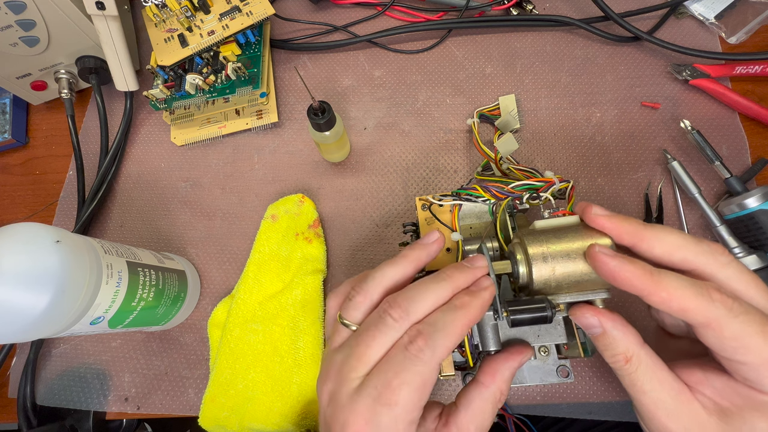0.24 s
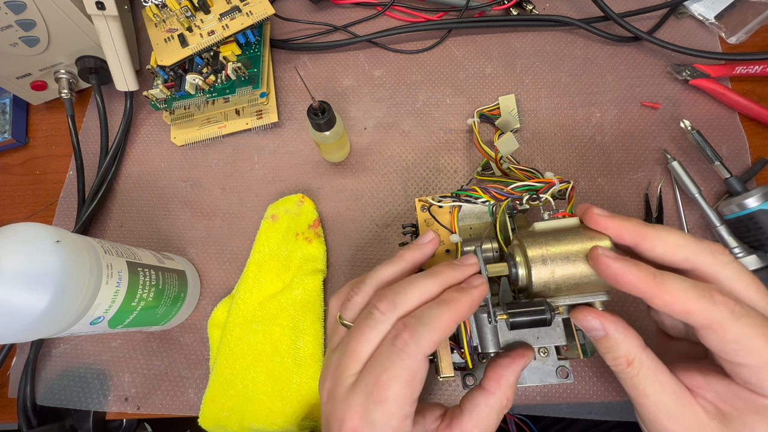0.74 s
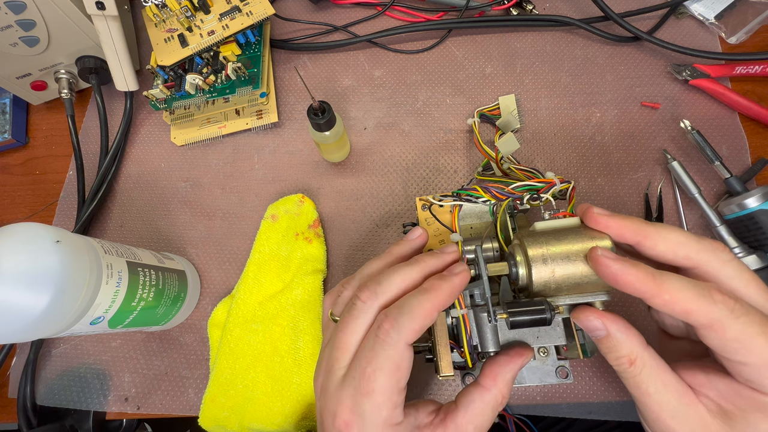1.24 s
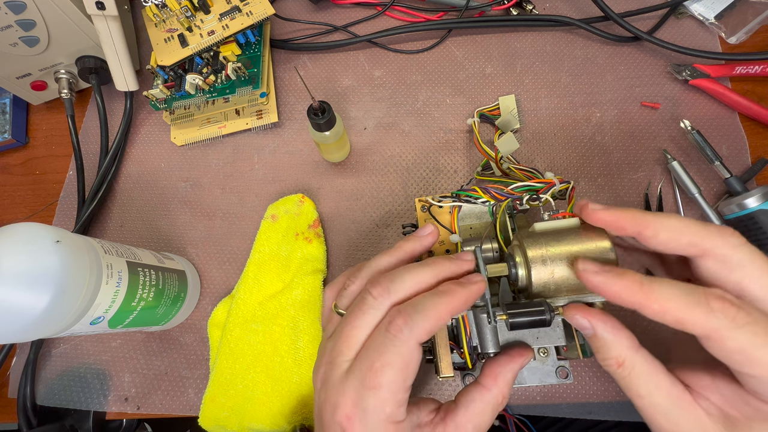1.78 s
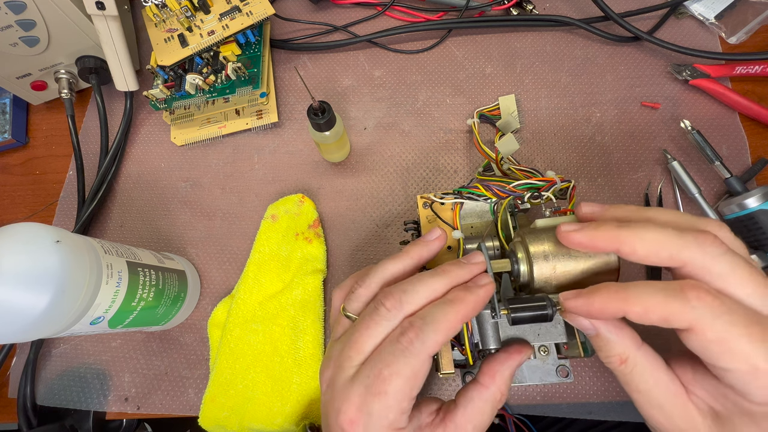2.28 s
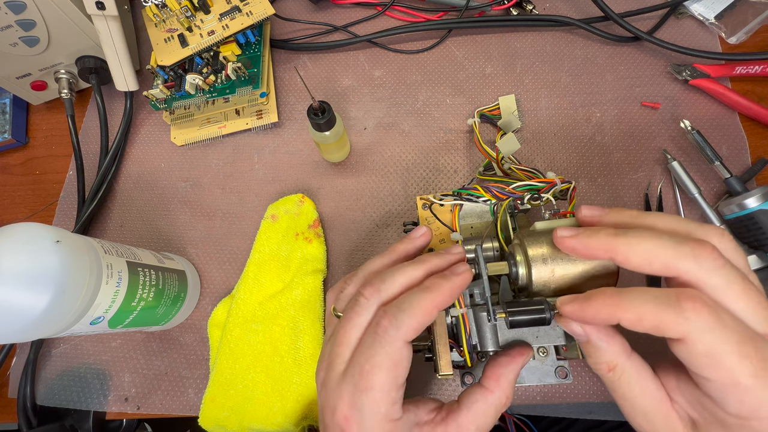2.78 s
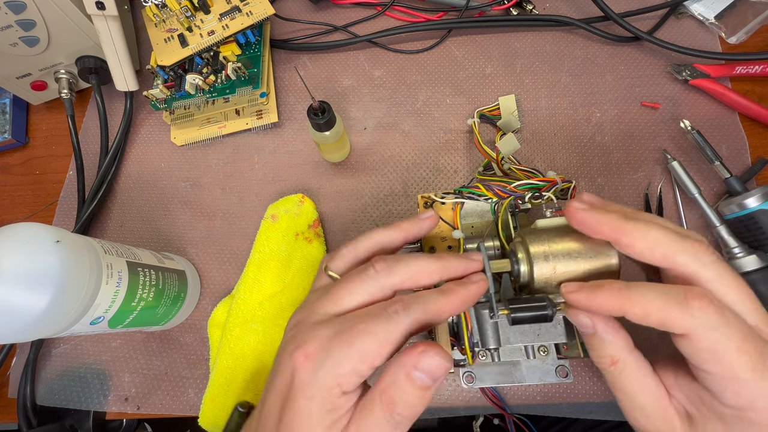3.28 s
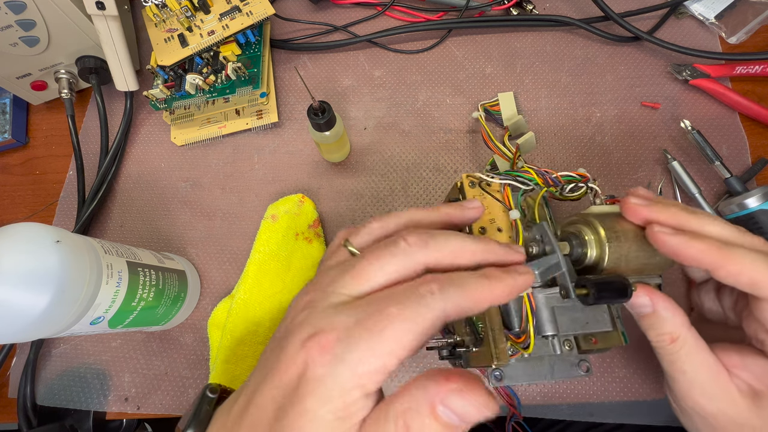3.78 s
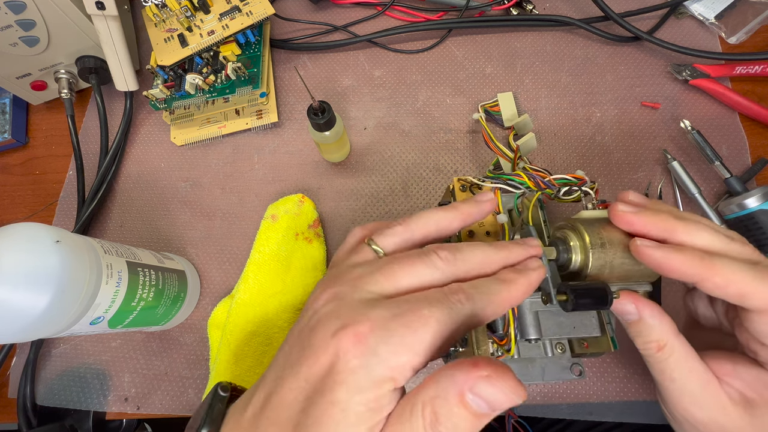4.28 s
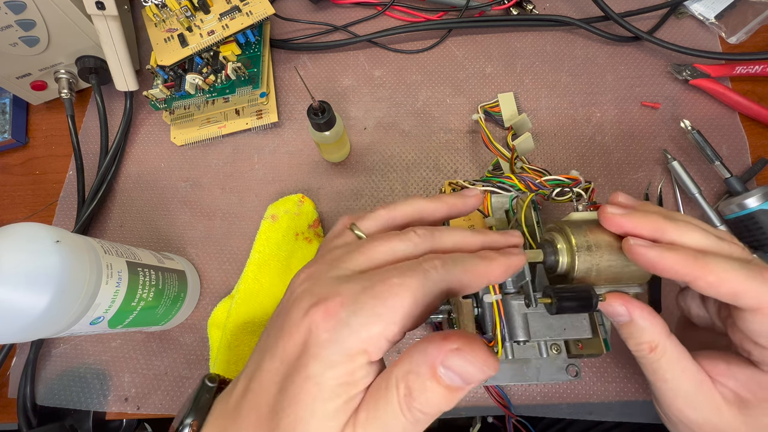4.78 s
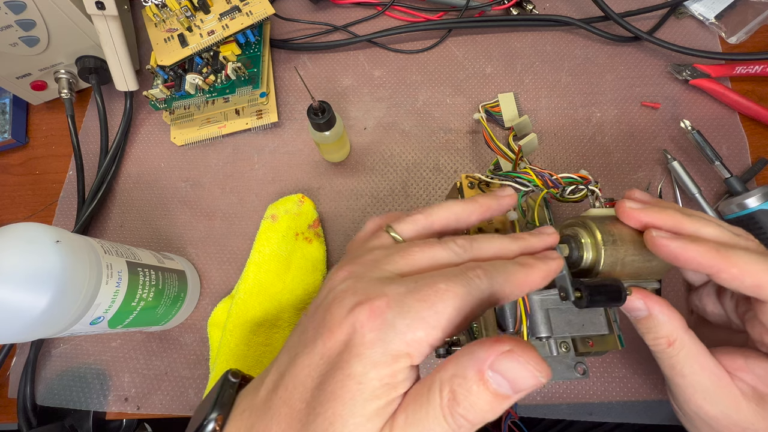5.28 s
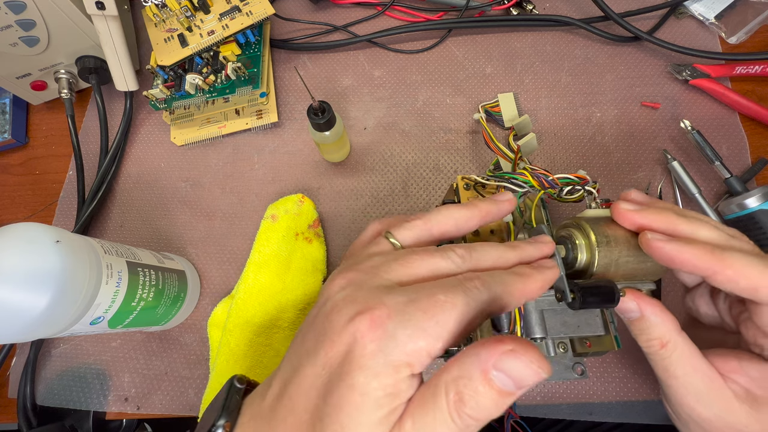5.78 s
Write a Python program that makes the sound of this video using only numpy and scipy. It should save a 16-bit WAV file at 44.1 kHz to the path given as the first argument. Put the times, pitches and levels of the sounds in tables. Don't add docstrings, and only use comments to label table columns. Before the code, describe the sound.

A solenoid is pushed and released by hand on a padded bench, heard close in stereo in a small room. A faint tick and scrape lead to a sharp metal clack at 0.2 s, with a small bouncing release tick at 0.4. The pattern repeats with clacks at 0.85 and 1.55, releases near 1.0 and 1.7. A softer, duller clack comes at 2.35, then a dull knock and thump at 2.5. After a pause, a soft clack at 3.4 is followed by a heavy low bench thud at 3.7. A firmer clack lands at 4.35, with another thud at 4.6 and a cluster of dull knocks around 4.95. A release and thump fall near 5.3; catches lead to the hardest, brightest clack at 5.8, then closing ticks around 6.0. Low fan hum, faint transformer buzz, soft air and hiss continue throughout.

```python
import sys
import numpy as np
from scipy import signal
from scipy.fft import rfft, irfft, next_fast_len
from scipy.io import wavfile
from scipy.ndimage import map_coordinates

SR = 44100
rng = np.random.default_rng(int(sys.argv[2]) if len(sys.argv) > 2 else 0)


def int16_out(signal):
    q = np.round(np.clip(np.atleast_2d(signal).T, -1, 1) * 32767)
    wavfile.write(sys.argv[1], SR, q.astype(np.int16))


def how_loud(loudness_db):
    steps = np.asarray(loudness_db, float) / 20
    return 10 ** steps


N = 266364

# start_s [s], peak_db [dB], brightness_db [dB]
CLACKS = [
    (0.188, -26.5, -0.5),
    (0.8364, -26, -1),
    (1.5422, -27.5, -0.9),
    (2.3478, -31.5, -2),
    (3.4191, -30.5, -0.5),
    (4.364, -28, .3),
    (5.7749, -25, 1.5),
]
# pitch_hz [Hz], width_hz [Hz], level_db [dB]
STOP_MODES = [(577, 48, 4.5), (790, 44, 8), (1196, 32, 4.5), (1446, 27, -5.5), (1600, 152, 0.5),
              (1822, 24, 0), (1980, 69, -4), (2287, 220, 1.5), (3360, 250, -12.5), (4710, 184, -3.5),
              (4850, 38, -25), (6400, 140, -15.5), (9230, 170, -21)]


def clacks():
    return contacts(CLACKS, STOP_MODES, low_db=-3.5, high_db=-6, t60_ms=48, part_hz=4896, spread_db=3.0, damping=2.0,
                    ring_db=0.5, accent_db=-3.5, room_db=-12, rise_s=0.00049, blow_db=19.5, spike_db=6.5)


# pitch_hz [Hz], width_hz [Hz], level_db [dB]
LEVER_MODES = [(1600, 120, -6.5), (3310, 150, 15), (5100, 83, -30), (7450, 350, -13), (9330, 270, -17),
               (12460, 270, -4)]


def lever_contacts(events, **settings):
    return contacts(events, LEVER_MODES, ring_db=-0.5, accent_db=5.5, room_db=-7.5, rise_s=0.00091,
                    blow_db=12.5, spike_db=2.5, **settings)


# start_s [s], peak_db [dB], brightness_db [dB]
PUSHES = [
    (0.1308, -48, 0),
    (0.7836, -51, 1),
    (1.492, -53.5, -2.5),
    (3.3516, -56, 3.2),
    (4.3208, -53, -1),
]
# start_s [s], peak_db [dB], brightness_db [dB]
MORE_PUSH_TICKS = [
    (.152, -55, -1.5),
    (0.169, -57, -4),
    (0.809, -60.5, -2.5),
    (1.4415, -68, -10.5),
    (1.514, -56.5, -6.5),
    (3.229, -72.5, 13.5),
    (3.373, -69, -2),
    (4.304, -63.5, -8),
]


def pushes():
    return lever_contacts(PUSHES + MORE_PUSH_TICKS, low_db=3.5, high_db=-0.5, t60_ms=56, part_hz=3325)


# start_s [s], peak_db [dB], brightness_db [dB], loudest_pitch_hz [Hz]
CATCHES = [
    (.826, -56, -1, 5900),
    (1.53, -61.5, 1, 1600),
    (4.346, -59.5, 1, 1600),
    (4.355, -52, 1.5, 5660),
    (5.751, -48, 3.5, 2400),
    (5.764, -46.5, -5.5, 1650),
    (3.549, -68, -11, 1440),
    (5.236, -77.5, -20.5, 1600),
    (5.912, -65.5, -14.5, 1640),
]


def catches():
    return lever_contacts(CATCHES, low_db=5.5, high_db=-12, t60_ms=50, part_hz=1600)


# start_s [s], peak_db [dB], rebound_after_s [s], rebound_loss_db [dB]
RELEASES = [
    (0.407, -45.5, 0.022, 6),
    (1.0086, -47, .021, 11),
    (1.717, -47.5, 0.017, 3.5),
    (3.5703, -50.5, 0.023, 2.5),
    (4.5006, -47.5, .019, 2),
    (5.2676, -49, 0.017, 1.5),
    (5.9651, -50, 0.021, 1),
]
# start_s [s], peak_db [dB], brightness_db [dB]
TICKS = [
    (0.627, -70.5, 3),
    (1.7774, -70, 13),
    (1.813, -65, -4),
    (2.249, -66, 1),
    (2.5403, -57, -10),
    (2.583, -60.5, -2.5),
    (6.0354, -51, -3),
]
# pitch_hz [Hz], width_hz [Hz], level_db [dB]
LINK_MODES = [(1830, 78, -26), (2400, 70, -32), (3200, 57, -13), (6300, 130, -13), (6820, 1200, 0),
              (8990, 270, 5)]


def linkage_ticks():
    rebound_bright_db = -1.5
    first_ticks = [(s, db, 0) for s, db, *_ in RELEASES]
    rebounds = [(s + after_s, db - loss_db, rebound_bright_db) for s, db, after_s, loss_db in RELEASES]
    return contacts(first_ticks + rebounds + TICKS, LINK_MODES, low_db=-1.0, high_db=-3.5, t60_ms=54, part_hz=1745,
                    ring_db=-12.5, accent_db=1, room_db=-8.5, rise_s=0.0021, blow_db=10.5, spike_db=3.5)


# start_s [s], peak_db [dB], brightness_db [dB]
KNOCKS = [(0.3972, -58.5, 0), (0.996, -63, -4.5), (1.7494, -61.5, 1), (1.8692, -71.5, -3), (2.531, -52, -2),
          (3.323, -66.5, 2), (3.6757, -48.5, 2.5), (3.7605, -69, -6), (4.1894, -63.5, 0.5),
          (4.2742, -58.5, -2.5), (4.5707, -50, 3.7), (4.9201, -57, 0.5), (4.9438, -47, 4.5),
          (4.969, -55.5, 5), (4.984, -58.5, 5), (5.037, -54, -1.5), (5.3485, -62, -3), (5.6693, -58, 1.5),
          (5.7295, -51, 4)]
# pitch_hz [Hz], width_hz [Hz], level_db [dB]
CHASSIS_MODES = [(516, 510, -10.5), (1650, 198, 2.5), (2440, 390, -7.5), (3260, 460, 0.5),
                 (4450, 1300, -16)]


def knocks():
    return contacts(KNOCKS, CHASSIS_MODES, low_db=7.0, high_db=-11.5, t60_ms=48, part_hz=1814,
                    ring_db=6.0, accent_db=3, room_db=-2.0, rise_s=0.0035, blow_db=14.5, spike_db=4.0)


# pitch_hz [Hz], level_db [dB per Hz]
CRACK = [(300, 2.5), (450, -2), (1000, -4.5), (2000, -5.5), (2700, -12.5), (4900, -11), (6500, -12),
         (7600, -22), (9300, -15.5), (10500, -23), (12800, -14), (14500, -35.5), (16000, -20), (16500, -60)]
# pitch_hz [Hz], t60_s [s]
ROOM = [(400, 0.34), (1000, 0.35), (2500, 0.26), (6000, 0.28), (12000, 0.11)]


def contacts(events, modes, low_db, high_db, t60_ms, part_hz, ring_db, accent_db, room_db, rise_s, blow_db, spike_db,
             loose_db=-6, spread_db=3.5, damping=1):
    out = np.zeros((2, N + SR))
    t = np.arange(SR // 8) / SR
    for s, db, bright_db, *own_hz in events:
        accent_hz = own_hz[0] if own_hz else part_hz * (1 + .02 * rng.standard_normal())
        fade = (1 - np.exp(-t / rise_s)) * how_loud(-60e3 * t / max(t60_ms, 2))
        fade = fade * how_loud(spike_db * rng.standard_normal(len(t)))
        shared = rng.standard_normal(len(t))
        scattered = rng.standard_normal((2, len(t)))
        chatter = fade * (shared + how_loud(loose_db) * scattered)
        chatter[:, round(rise_s * SR)] += how_loud(blow_db)
        sizes = how_loud(ring_db + spread_db * rng.standard_normal(len(modes)))

        def metal(f, blur=1):
            wide = blur * damping
            total = how_loud(along(CRACK, f)) + how_loud(accent_db) * resonance(f, accent_hz, 210 * blur) / np.sqrt(blur)
            for k, (hz, width_hz, mode_db) in enumerate(modes):
                strength = (-1) ** k * sizes[k] * how_loud(mode_db)
                total = total + strength * resonance(f, hz, wide * width_hz) / np.sqrt(wide)
            return total

        hit = filtered(chatter, lambda f: ports(f) * metal(f))
        low = peak_db(hit, lambda f: f < 2500)
        middle = peak_db(hit, lambda f: (f > 2500) & (f < 7500))
        high = peak_db(hit, lambda f: f > 7500)
        tilt = [(2200, low_db - bright_db - low), (2800, -middle), (7000, -middle), (8000, high_db + bright_db - high)]
        hit = filtered(hit, lambda f: how_loud(db + along(tilt, f)))
        echo = filtered(tail(ROOM, .3), lambda f: metal(f, 5) * how_loud(db + along(tilt, f)))
        echo = echo * np.linalg.norm(chatter[0])
        echo = echo * (1 - np.exp(-np.arange(echo.shape[1]) / SR / 0.0049))
        start = round(s * SR)
        out[:, start:][:, :len(t)] += hit
        out[:, start:][:, :echo.shape[1]] += how_loud(room_db) * echo
    return out[:, :N]


def resonance(f, hz, width_hz):
    return 1j * f * width_hz / (hz * hz - f * f + 1j * f * width_hz)


def peak_db(hit, band):
    return 20 * np.log10(np.abs(filtered(hit.mean(0), band)).max())


def tail(t60s, seconds):
    hz, t, z = signal.stft(rng.standard_normal((2, round(seconds * SR))), SR, nperseg=256)
    fading = z * how_loud(-60 * t / along(t60s, hz)[:, None])
    echo = signal.istft(fading, SR, nperseg=256)[1]
    return echo / np.linalg.norm(echo, axis=1, keepdims=True)


# pitch_hz [Hz], left_minus_right_db [dB]
PORT_LEVEL = [(60, -1), (130, -2.5), (200, -9), (380, 0), (700, -4.5), (1300, 1.5), (2400, -5.5), (4400, 6),
              (6500, 9.5), (8100, 1), (15000, -0.5)]
# pitch_hz [Hz], left_lead [radians]
PORT_PHASE = [(100, 17), (180, 1.5), (260, 0.66), (500, 2.5), (800, 2), (1000, 3.5), (1400, 6), (1900, 4.5),
              (2400, 7.5), (4500, 8.0), (6000, 8.5), (7500, 4), (11000, 5), (13000, 5), (16000, 6.5)]


def ports(f):
    left_over_right = how_loud(along(PORT_LEVEL, f)) * np.exp(1j * along(PORT_PHASE, f))
    return left_over_right ** np.array([[.5], [-.5]])


# start_s [s], level_db [dB], upper_modes_db [dB]
THUMPS = [(0.139, -32.5, -6.5), (0.424, -30, -9), (0.795, -35, -4), (1.031, -36, -4.5), (1.498, -36, -8.5),
          (1.748, -33, -12.5), (1.791, -43, -18), (2.526, -33.5, -16), (2.553, -36.5, -13),
          (3.251, -41.5, -26), (3.348, -41.5, -4.5), (3.58, -51.5, 6.5), (3.688, -22, -13.5),
          (4.297, -34, -7), (4.329, -36, 2), (4.509, -52.5, 9), (4.578, -24.5, -9.5), (4.961, -32, -5),
          (5.001, -34.5, -2.5), (5.289, -35, -8), (5.359, -25.5, -12), (5.743, -33.5, -4),
          (5.99, -41.5, -3)]
# pitch_hz [Hz], level_db [dB]
BENCH_LOW = [(74, -1), (107, 1), (130, -7)]
# pitch_hz [Hz], level_db [dB]
BENCH_HIGH = [(165, -2.5), (180, 1), (205, -11.5), (268, -5), (305, -7.5)]
# pitch_hz [Hz], level_db [dB per Hz]
RUMBLE = [(40, -33), (70, 17), (110, 6.5), (180, 6.5), (300, -22), (450, -41.5)]


def bench():
    t60_s, press_s = 0.26, 0.07
    rest_db, lean_db = -75.5, -62.5
    out, press = np.zeros((2, N + SR)), np.zeros(N + SR)
    t = np.arange(SR // 2) / SR
    late_t = t - np.array([[0], [.0009]])
    rise = 1 - np.exp(-t / 0.012)
    from_clacks = [(s + 0.00391, -35.5, 0.4) for s, *_ in CLACKS]
    for s, db, upper_db in THUMPS + from_clacks:
        low, high = 0, 0
        for hz, mode_db in BENCH_LOW:
            low = low + how_loud(mode_db + rng.normal(0, 2.5)) * np.sin(2 * np.pi * hz * t)
        for hz, mode_db in BENCH_HIGH:
            high = high + how_loud(mode_db + rng.normal(0, 1.56)) * np.sin(2 * np.pi * (hz * late_t + rng.random()))
        ring = low * how_loud(-60 * t / t60_s) + how_loud(upper_db + 3.0) * high * how_loud(-60 * t / (0.62 * t60_s))
        out[:, round((s - .004) * SR):][:, :len(t)] += how_loud(db - 5.5) * rise * ring
        press[round(s * SR):][:len(t)] += t / press_s * np.exp(1 - t / press_s)
    rumble = (how_loud(rest_db) + how_loud(lean_db) * press[:N]) * rush(RUMBLE)
    return filtered(out[:, :N] + rumble, lambda f: np.abs(ports(f)))


# pitch_hz [Hz], unsteadiness_db [dB], level_db [dB rms]
FAN = [(52.8, -0.5, -59.5), (100.95, 1.5, -61), (133.2, 6.5, -75.5), (201.7, 4.5, -72.5), (301.6, 2, -86.5)]
# time_s [s], level_db [dB]
FAN_SWELL = [(0, -8), (1.2, 2), (1.8, 5), (3, -1.5), (3.5, 3.5), (4, -12), (4.5, 0), (5.2, -9), (6.04, -3)]


def fan_hum():
    t = np.arange(N) / SR
    lowest_db = -1 - 4.5 * np.exp(-t / 1)
    second_db = np.interp(t, *np.transpose(FAN_SWELL))
    fan = 0
    for (hz, sway_db, db), change_db in zip(FAN, [lowest_db, second_db] + [0] * (len(FAN) - 2)):
        level = how_loud(db + sway_db * wobble(5.3) + change_db)
        fan = fan + level * np.sqrt(2) * np.sin(2 * np.pi * hz * t + 1.2 * wobble(4.4))
    return fan * how_loud([[-1.1], [1.1]])


# multiple [of 60 Hz], level_db [dB rms]
MAINS = [(4, -81), (6, -90), (8, -90), (10, -91), (11, -86), (12, -85), (14, -88), (16, -90), (22, -94)]


def transformer_hum():
    t = np.arange(N) / SR
    hum = 0
    for multiple, db in MAINS:
        turns = round(multiple) * 60 * t + rng.random((2, 1))
        hum = hum + how_loud(db) * np.sqrt(2) * np.sin(2 * np.pi * turns)
    return hum


# pitch_hz [Hz], level_db [dB per Hz]
AIR = [(150, -29), (250, 1), (421, -12), (473, -5), (539, -13), (717, -5), (785, -11), (838, -7),
       (906, -13), (1390, -16), (1900, -7), (2770, -25), (5600, -30), (7280, -60), (12300, -120)]


def fan_air():
    return how_loud(-75) * rush(AIR, lo_hz=287) * how_loud([[-.6], [.6]])


# pitch_hz [Hz], level_db [dB per Hz]
HISS = [(5200, -57), (6400, -21), (7350, -2), (8200, -26.5), (9800, -29.5), (10500, -62), (11500, -29),
        (12500, -21), (14000, -31), (14500, -52), (15000, -90)]


def microphone_hiss():
    return how_loud(-76.5) * filtered(rush([(4000, -120)] + HISS), lambda f: f < 14400)


# pitch_hz [Hz], likeness [-1 to 1]
ALIKE = [(60, 0.91), (130, 0.28), (290, -0.0064), (640, -0.77), (1410, 0.31), (3100, -0.29), (6820, 0.036),
         (15000, 0.83)]


def rush(spectrum, lo_hz=0):
    def shares(hz):
        angle = np.arccos(np.clip(along(ALIKE, hz), -1, 1)) / 2
        return how_loud(along(spectrum, hz)) * np.array([np.cos(angle), np.sin(angle)])

    mid, side = filtered(rng.standard_normal((2, N)), shares)
    return np.array([mid + side, mid - side]) / np.std(filtered(mid, lambda hz: hz >= lo_hz))


def wobble(rate):
    knots = rng.standard_normal(int(N * rate / SR) + 4)
    return map_coordinates(knots, [np.arange(N) * rate / SR])


def along(points, hz):
    f, v = np.transpose(points)
    return np.interp(np.log(hz + 1), np.log(f + 1), v)


def filtered(x, response):
    m = next_fast_len(x.shape[-1] + 8192)
    return irfft(rfft(x, m) * response(np.fft.rfftfreq(m, 1 / SR)), m)[..., :x.shape[-1]]


def scene():
    mechanism = clacks() + pushes() + catches() + linkage_ticks() + knocks()
    background = fan_hum() + transformer_hum() + fan_air() + microphone_hiss()
    return mechanism + bench() + background


def roll_off(x):
    return signal.sosfilt(signal.butter(12, 16450, fs=SR, output="sos"), x)


# pitch_hz [Hz], level_db [dB]
COLOUR = [(25, -7), (40, -9.5), (52, 2), (10200, 0.5), (10800, -10), (11400, -2.5), (15800, -0.5),
          (16500, -43)]


def record(dry):
    mix = filtered(dry, lambda f: how_loud(along(COLOUR, f)))
    return roll_off(mix)


dry = scene()
out = record(dry)
int16_out(out)
```